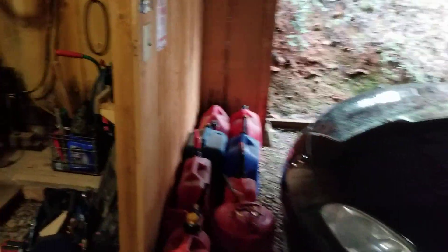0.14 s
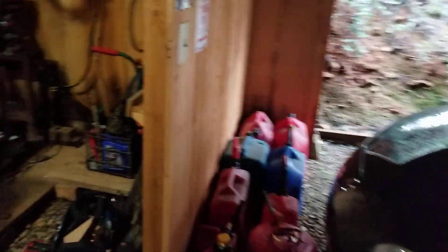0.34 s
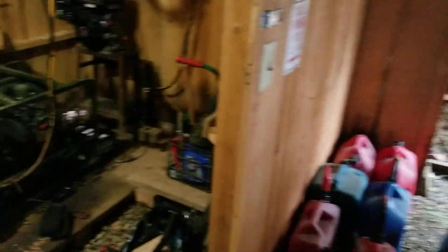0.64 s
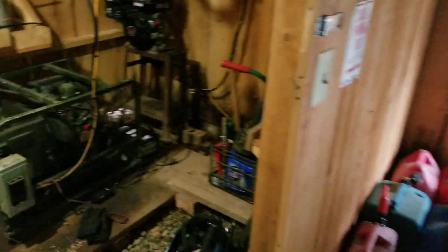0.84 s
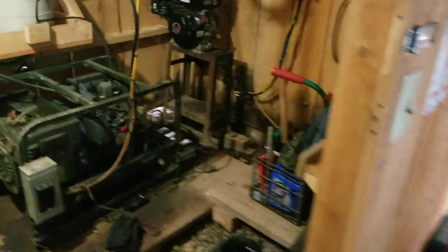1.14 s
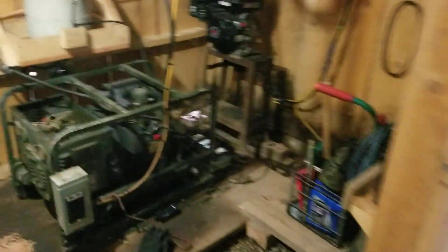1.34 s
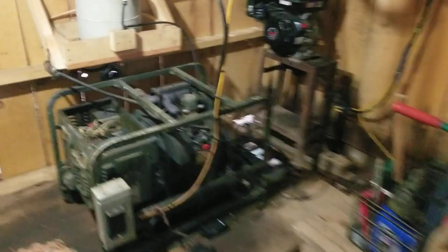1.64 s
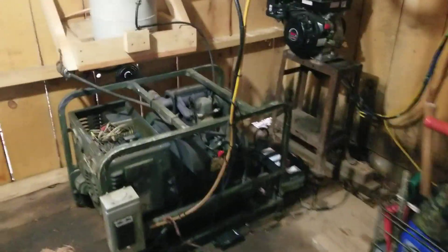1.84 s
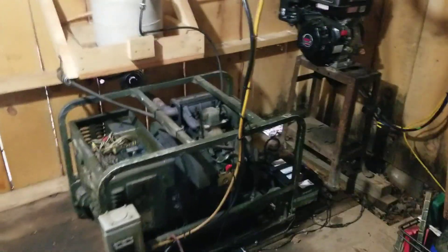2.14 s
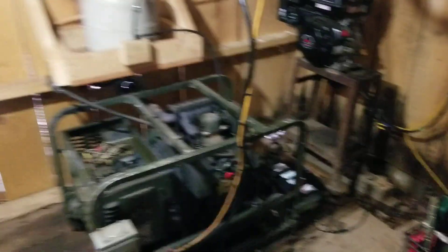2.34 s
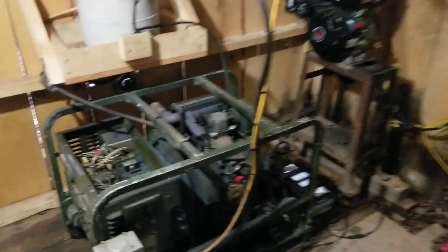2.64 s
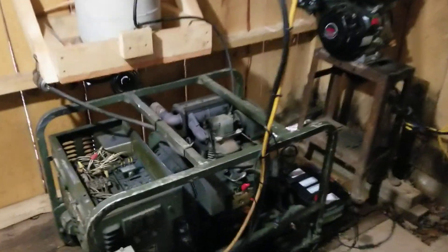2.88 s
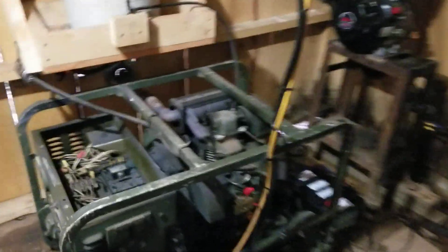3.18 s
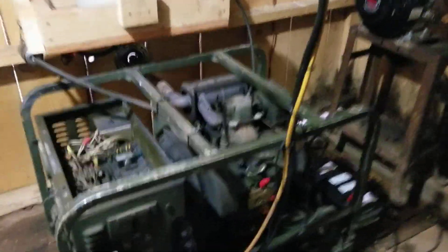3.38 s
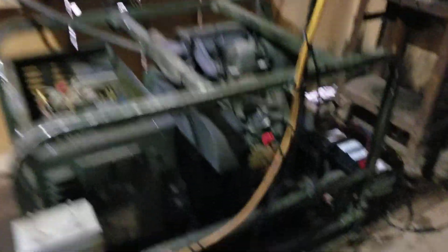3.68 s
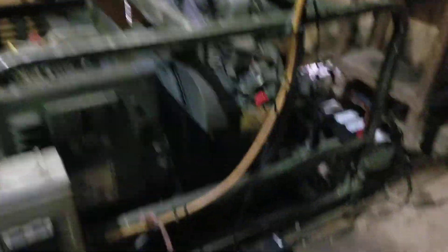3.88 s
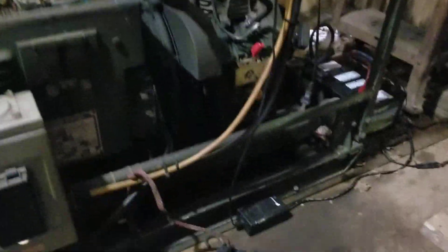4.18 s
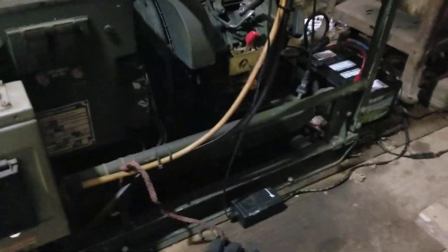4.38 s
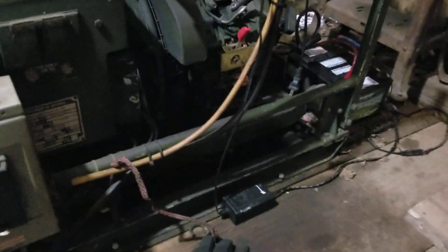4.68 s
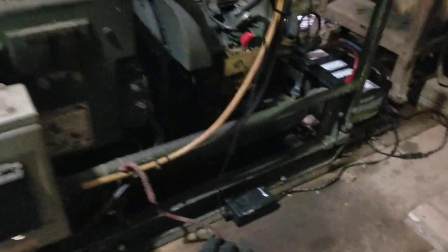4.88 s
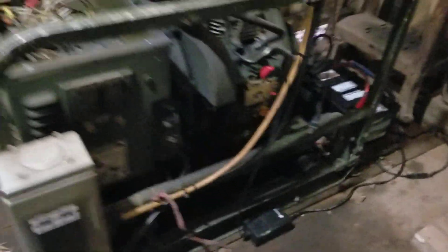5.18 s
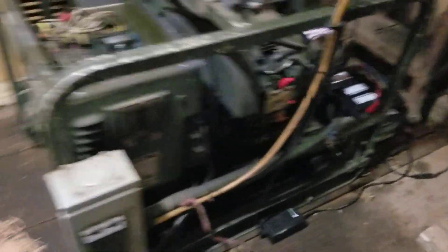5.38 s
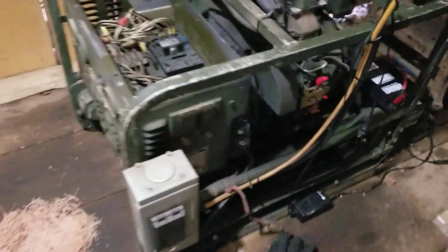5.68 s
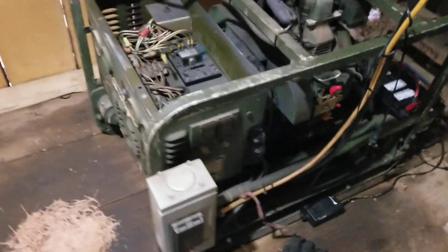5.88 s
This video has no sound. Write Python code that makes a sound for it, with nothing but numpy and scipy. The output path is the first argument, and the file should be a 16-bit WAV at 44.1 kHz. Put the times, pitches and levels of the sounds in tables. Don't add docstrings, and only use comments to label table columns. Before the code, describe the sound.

Close, overloaded roar of a generator engine at constant speed: deep throbbing hum, rapid knocking, rattling air and fan hiss, tone shifting with position.

```python
import sys
import numpy as np
from scipy import signal
from scipy.fft import rfft, irfft
from scipy.io import wavfile
from scipy.ndimage import uniform_filter1d, map_coordinates

SR = 44100
rng = np.random.default_rng(int(sys.argv[2]) if len(sys.argv) > 2 else 0)


def transcribe(signal):
    frames = np.atleast_2d(signal).T
    limited = np.clip(frames, -1, 1)
    pcm = np.round(limited * 32767).astype(np.int16)
    wavfile.write(sys.argv[1], SR, pcm)


def boost(x):
    u = np.asarray(x, float) / 20
    return 10 ** u


N = 265482

SHAFT_HZ = 29.962
TURN_SAMPLES = 4096

# time_s, nearer_m, speed_m_per_s, firing_angle_turns,
# inverted_wave_share_order_4, inverted_wave_share_orders_5_6
WALK = [
    (0, 0, .4, .55, 1, 1.5),
    (.67, .5, .35, .53, .9, 1),
    (1.33, .8, .3, .5, .95, .85),
    (2, .97, .15, .5, 1, .85),
    (3.3, 1.08, .4, .48, 1, .65),
    (4, 1.05, .15, .47, .45, .25),
    (4.7, 1.03, .06, .47, .35, .25),
    (5.3, .9, .35, .42, .85, .3),
    (6.02, .7, .3, .34, 1.1, .35),
]
# time_s, inward_m, toward_engine_m
FLOOR_PATH = [(0.0, -0.31, -0.03), (0.4, -0.13, 0.02), (0.8, 0.35, 0.01), (1.2, 0.52, 0.07),
              (1.61, 0.62, -0.04), (2.01, 0.78, -0.01), (2.41, 0.78, -0.02), (2.81, 0.84, 0.08),
              (3.21, 0.87, 0.12), (3.61, 1.06, 0.38), (4.01, 1.07, 0.59), (4.41, 1.06, 0.61),
              (4.82, 1.05, 0.61), (5.22, 1.09, 0.55), (5.62, 1.26, 0.38), (6.02, 1.1, 0.38)]
# time_s, head_ping_db, left_minus_right_db, fan_hiss_db
FACING = [(0.0, -46, 1.5, -41), (0.37, -50, 2.5, -41), (0.6, -59, 1.5, -38), (1.47, -37.5, 3.5, -35),
          (2.41, -39, 3.0, -37), (3.52, -34, 3.5, -37), (4.04, -50, 4.5, -37), (5.35, -29.5, 4.5, -36),
          (6.02, -22.5, 3, -37)]
# time_s, open_view_db, wall_side_db, sump_side_db
BLOCK_VIEW = [(0.0, -33.5, 8.5, 2), (0.35, -34.5, 11.5, 7.5), (0.71, -32, 11, 6.7), (1.06, -30.5, 9.5, 2.5),
              (1.42, -29, 5, 5.5), (1.77, -30, 10.5, 4), (2.12, -32, 12, 4), (2.48, -31.5, 10.7, 3),
              (2.83, -32.0, 8, 4), (3.19, -31, 7.5, 5.0), (3.54, -31.5, 8, 8.5), (3.9, -29, 8, 5),
              (4.25, -30, 5.5, 5), (4.6, -30, 8.5, 6.5), (4.96, -29.1, 8, 4), (5.31, -29.5, 9.7, 4),
              (5.67, -26, 6.5, 3), (6.02, -26, 5.5, 2)]
# centre_hz, open_view_share, wall_side_share, sump_side_share
BLOCK_PARTS = [
    (656, 1.1, -0.23, 0.9),
    (1120, 0.99, 1.04, -0.13),
    (1880, 0.83, -0.13, -0.54),
    (3800, 1.33, 0.25, 0.72),
]
STRONG_ORDERS = [
    [2, 3, 4, 5],
    [6, 7, 10, 12],
    [8, 9, 11, 18],
    [36, 37, 38, 43],
    [14, 26, 54, 60],
    [13, 17, 22, 25, 27, 28, 32, 39, 40, 41, 42, 46, 47, 48, 49, 52, 53, 56, 59, 62],
]
# crest_db, inward_waves_per_m,
# toward_engine_waves_per_m, first_crest_waves, share_left_at_node
ORDER_NODES = [(-19.5, -0.044, 0.018, 0.25, 0.38), (-20, -0.053, 0.22, 0.37, 0.23),
               (-15, 0.01, 0.257, 0.409, 0.13), (-26, 0.431, 0.2, 0.17, 0.085),
               (-27, -0.427, 0.34, 0.03, 0), (-25, -0.473, 0.23, 0.3, 0.43),
               (-30.5, -0.08, 0.69, 0.3, 0.27), (-30.5, 0.018, 0.87, 0.39, 0.29),
               (-31, 0.307, 0.88, 0.3, 0.3), (-32, 0.223, 0.16, 0.065, 0),
               (-31.5, -0.484, 0.63, 0.45, 0.34), (-35, -1.485, 1.1, 0.075, 0.14),
               (-27.5, 0.228, 0.03, 0.43, 0), (-30, 0.5, 0.047, 0.082, 0.34),
               (-33, 0.034, 0.53, 0.5, 0.013), (-31, 0.714, 1.8, 0.47, 0.14),
               (-34, -0.11, 0.69, 0.14, 0.013), (-39, 0.23, 0.22, 0.39, 0.43),
               (-33, -0.05, 1.8, 0.26, 0.65), (-37.5, -1.34, 0.5, 0.11, 0.052),
               (-36.5, -0.38, 1.44, 0.36, 0.41), (-38.5, 0.087, 1.29, 0.2, 0.17),
               (-39, -1.5, 0.88, 0.084, 0.44), (-37, -0.46, 1.68, 0.41, 0.33),
               (-39.5, 0.056, 0.44, 0.54, 0.1), (-37.5, -0.66, 0.49, 0.29, 0.64),
               (-37.0, -0.5, 0.03, 0.22, 0.29), (-34.3, -0.9, 0.31, 0.049, 0.22),
               (-37, -0.15, 0.66, 0.37, 0.33), (-30.5, -0.347, 0.14, 0.018, 0.18),
               (-41.5, 1.33, 0.79, 0.13, 0.33), (-38, -0.1, 1.92, 0.23, 0.74),
               (-37.3, -0.0058, 0.82, 0.21, 0.28), (-36, -0.76, -0.2, 0.46, 0.22),
               (-35, -0.56, 0.14, 0.3, 0.4), (-45, 0.29, 1.14, 0.09, 0.36),
               (-36.5, -0.47, 1.14, 0.35, 0.28), (-38, 0.48, 1.4, 0.19, 0.13),
               (-40.5, 1.87, 1.1, 0.23, 0.19), (-37, -0.023, 0.74, 0.17, 0.19)]
# time_s, angle_turns
SKID_THUMP = [(0, .755), (.45, .755), (.8, .687), (2.5, .69), (3.1, .575), (4, .548), (4.4, .538),
              (5.2, .55), (6.02, .558)]
# time_s, width_s, swell_db, centre_hz, width_hz
CLOSE_PASSES = [
    (5.15, 0.42, 2.5, 1095, 45),
    (5.85, .3, 5, 1740, 200),
]
# frequency_hz, level_db
KNOCK_COLOUR = [(380, 3.5), (450, -4.5), (800, -2.5), (900, -3.5), (1050, -2), (1400, 2), (1800, -2),
                (2100, -6), (3000, -13.5), (3500, -14.5), (4500, -20), (6000, -54)]
# frequency_hz, width_hz, level_db
HEAD_RINGS = [(1620, 140, -3), (1820, 260, 0), (2450, 300, -7), (3500, 300, -14)]
# frequency_hz, width_hz, level_db
WALL_RINGS = [(1130, 260, 0), (1420, 200, -12)]
# frequency_hz, level_db (per Hz)
ROAR_COLOUR = [(26, -47), (45, -13), (69, -22), (210, -13), (310, -12), (361, -11), (438, -14), (804, -9),
               (896, -12), (1110, -4.5), (1210, -9.5), (1440, -6.5), (8000, -34), (10400, -38),
               (17600, -120)]
# frequency_hz, level_db (per Hz)
FAN_COLOUR = [(3820, -4), (6500, -5), (7780, -14), (9550, 3.5), (10100, 2.5), (12600, 0.5), (15100, -3.5),
              (15900, -8.5)]
# frequency_hz, left_right_likeness (0 to 1)
EAR_LIKENESS = [(130, .99), (290, .94), (640, .5), (1410, .06), (3100, .02), (15000, 0)]


def engine(turns, times):
    order = np.arange(201)
    waves = standing_waves(times, order * SHAFT_HZ, grain=.4)
    return tones(turns, times, order, waves) + knock(turns, times, order, waves)


def tones(turns, times, order, waves):
    hz = order * SHAFT_HZ
    ears = boost(np.outer([.5, -.5], curves(FACING, times)[1]))[..., None]
    phase = order_phase(times, order, waves)

    view = boost(.25 * (order > 12) * block_db(times, hz))
    for s, width_s, swell_db, centre_hz, width_hz in CLOSE_PASSES:
        in_time = ((times[:, None] - s) / width_s) ** 2
        in_pitch = ((hz - centre_hz) / width_hz) ** 2
        view = view * boost(swell_db * np.exp(-in_time - in_pitch))

    orders = np.zeros_like(waves)
    orders[..., 1:2] = boost(-50) * ears
    ends = np.cumsum([len(which) for which in STRONG_ORDERS[:-1]])
    gains = np.split(order_gain(times), ends, axis=1)
    looseness = (1.0, 0.39, 0.22, 0.78, 0.89, 0.61)
    for gain, which, loose in zip(gains, STRONG_ORDERS, looseness):
        sway = (waves[0] - waves[1])[:, which] * [[[loose]], [[-loose]]]
        orders[..., which] = gain * np.exp(2j * np.pi * phase[:, which]) * (ears + sway)
    return play(orders * view, turns)


def order_phase(times, order, waves):
    fourth, fifth = curves(WALK, times)[3:, :, None]
    flip = (order == 4) * fourth + np.isin(order, [5, 6]) * fifth + (order == 7)
    phase = -.07 + flip / 2 + (order > 12) * rng.random(len(order))

    low_ringing = .05 * order + .073 * (order - 37.7)
    ringing = np.where(order < 50, low_ringing, .073 * (order - 60.7))
    in_step = (order > 30) & ~np.isin(order, [32, 41, 42, 46, 47, 48, 49])
    firing_angle = curves(WALK, times)[2][:, None]
    phase = np.where(in_step, -order * firing_angle - ringing, phase)

    thumping = (order > 7) & (order < 15)
    phase = np.where(thumping, .4 - order * curves(SKID_THUMP, times).T, phase)

    smear = np.where(order > 14, .2, (order > 7) * .28)
    smeared = ~np.isin(order, STRONG_ORDERS[3][:3])
    return phase + smear * smeared * waves.mean(axis=0).real


def order_gain(times):
    crest_db, inward, toward, first, leak = np.transpose(ORDER_NODES)
    place = curves(FLOOR_PATH, times).T @ np.array([inward, toward]) - first
    return boost(crest_db) * np.hypot(np.cos(2 * np.pi * place), leak)


def knock(turns, times, order, waves):
    hz = order * SHAFT_HZ
    free = (order > 12) & ~np.isin(order, np.concatenate(STRONG_ORDERS))
    colour = unit(boost(along(KNOCK_COLOUR, hz)) * free) / np.sqrt(len(order))
    block = play(boost(-23.5 + block_db(times, hz)) * colour * waves, turns)
    block = block * firing(turns, depth_db=7.5, decay=1.0)

    scatter = rng.standard_normal((len(times), 3))
    angle = curves(WALK, times)[2] + .001 * scatter[:, 0]
    door_s, door_width_s, door_db, away_db = 0.4, 0.3, -41, -82
    at_door = np.exp(-((times - door_s) / door_width_s) ** 2)
    wall_db = away_db + (door_db - away_db) * at_door
    head = ping(HEAD_RINGS, curves(FACING, times)[0] + 1.2 * scatter[:, 1], order, angle)
    wall = ping(WALL_RINGS, wall_db + .8 * scatter[:, 2], order, angle + .05)
    ears = np.array([1.3 + .15 * waves[0], .7 + .15 * waves[1]])
    return block + play((head + wall) * ears, turns)


def ping(rings, level_db, order, angle):
    hz = order * SHAFT_HZ
    shape = 0
    for centre, width, db in rings:
        resonance = 1j * hz * width / (centre * centre - hz * hz + 1j * hz * width)
        shape = shape + boost(db) * resonance ** 2
    struck = np.exp(-2j * np.pi * order * angle[:, None])
    return boost(level_db)[:, None] * unit(shape) / np.sqrt(len(order)) * struck


def roar(turns):
    ears = boost(np.array([[.7], [-.7]]))
    push = firing(turns, depth_db=3.5, decay=0.65)
    return boost(-25.0) * ears * push * rush(ROAR_COLOUR, patchy_db=2.0, follow=1.0)


def fan(turns):
    ears_db = np.array([[.4], [-.4]])
    level = boost(curves(FACING, np.arange(N) / SR)[2] + 3.0 + ears_db)
    throb = firing(turns + 0.2, depth_db=2.0, decay=.4)
    return level * throb * rush(FAN_COLOUR, patchy_db=1.0, follow=0.23)


def rush(spectrum, patchy_db, follow):
    hz, t, z = signal.stft(rng.standard_normal((2, N)), SR, nperseg=1024)
    patches = uniform_filter1d(rng.standard_normal(z.shape[1:]), 12, 0)
    patches = unit(uniform_filter1d(patches, 10, 1))
    gain = boost(along(spectrum, hz)[:, None] + patchy_db * patches + follow * block_db(t, hz).T)
    noise = signal.istft(pair(*z, hz[:, None]) * gain, nperseg=1024)[1]
    return unit(noise[:, :N])


def firing(turns, depth_db, decay):
    since = (turns - curves(WALK, np.arange(N) / SR)[2]) % 1
    return unit(boost(depth_db * uniform_filter1d(np.exp(-since / decay), size=160)))


def shaft():
    t = np.arange(N) / SR
    turns = SHAFT_HZ * (t + curves(WALK, t)[0] / 343)
    return turns, np.interp(np.arange(int(turns[-1]) + 2), turns, t)


def play(orders, turns):
    cycles = irfft(orders, TURN_SAMPLES) * TURN_SAMPLES / np.sqrt(2)
    cycles = np.concatenate([cycles, cycles[..., :1]], axis=-1)
    where = [turns, turns % 1 * TURN_SAMPLES]
    return np.array([map_coordinates(c, where, order=1) for c in cycles])


def block_db(t, hz):
    view = curves(BLOCK_VIEW, t).T - np.mean(BLOCK_VIEW, axis=0)[1:]
    centre_hz, *shares = np.transpose(BLOCK_PARTS)
    return view @ np.array([along(list(zip(centre_hz, share)), hz) for share in shares])


def standing_waves(times, hz, grain):
    walked_m = np.cumsum(curves(WALK, times)[1]) * np.mean(np.diff(times))
    place = np.minimum(walked_m[:, None] * hz / 343 / grain, 396)
    knots = rng.standard_normal((4, len(hz), 400))
    which = np.arange(len(hz)) + 0 * place
    a, b, c, d = (map_coordinates(k, [which, place]) for k in knots)
    return pair(unit(a + 1j * b), unit(c + 1j * d), hz)


def pair(a, b, hz):
    turn = np.arccos(np.clip(along(EAR_LIKENESS, hz), -1, 1)) / 2
    middle = np.cos(turn) * a
    side = np.sin(turn) * b
    return np.array([middle + side, middle - side])


def unit(x):
    return x / np.sqrt(np.mean(np.abs(x) ** 2) + 1e-20)


def along(points, hz):
    f, v = np.transpose(points)
    return np.interp(np.log(hz + 1), np.log(f + 1), v)


def curves(rows, t):
    s, *cols = np.transpose(rows)
    return np.array([np.interp(t, s, c) for c in cols])


def scene():
    turns, times = shaft()
    return engine(turns, times) + roar(turns) + fan(turns)


def low_pass(x):
    return signal.sosfilt(signal.butter(12, 16040, fs=SR, output="sos"), x)


def record(dry):
    soft = dry / (1 + np.abs(dry / .95) ** 6) ** (1 / 6)
    top_hz = 15720
    band = irfft(rfft(soft) * (np.fft.rfftfreq(N, 1 / SR) < top_hz), N)
    return low_pass(band)


dry = scene()
out = record(dry)
transcribe(out)
```